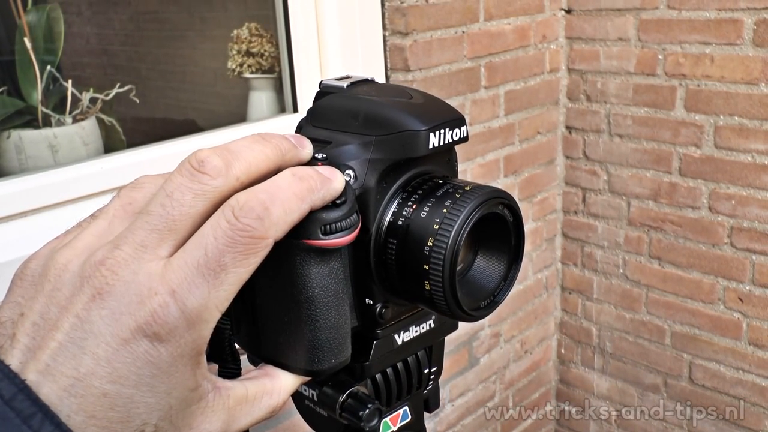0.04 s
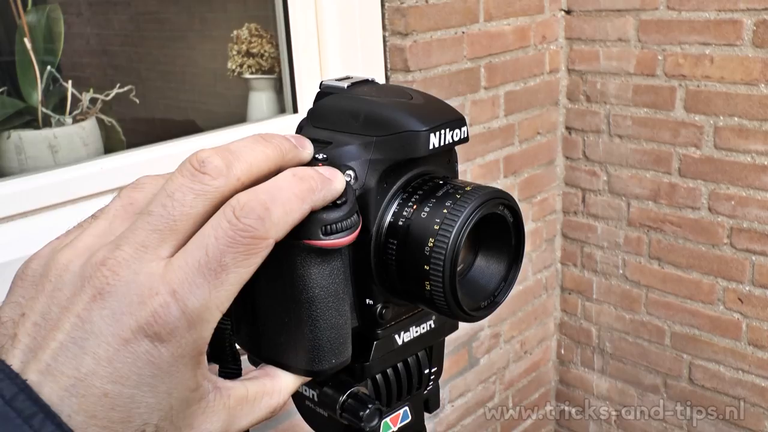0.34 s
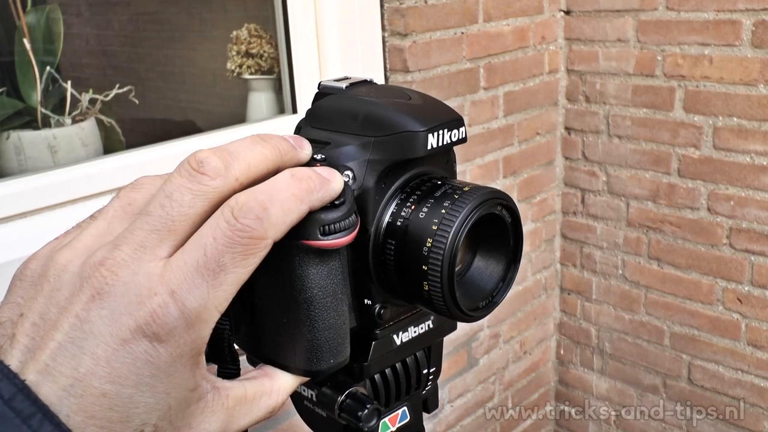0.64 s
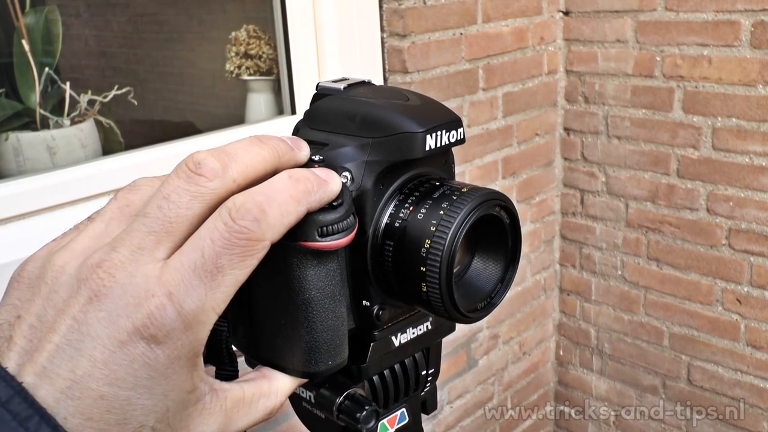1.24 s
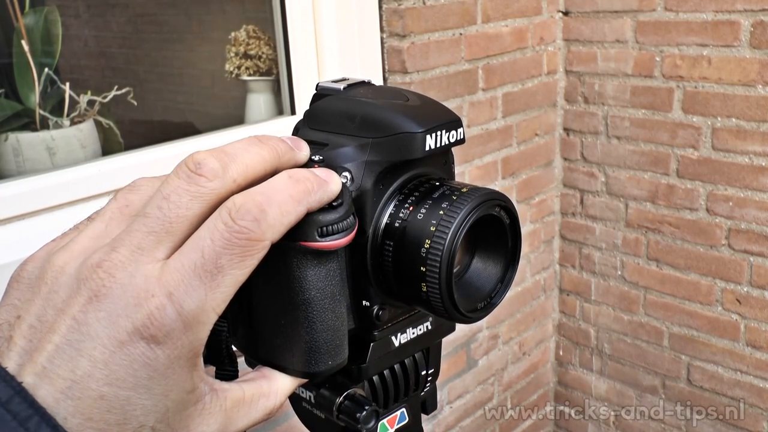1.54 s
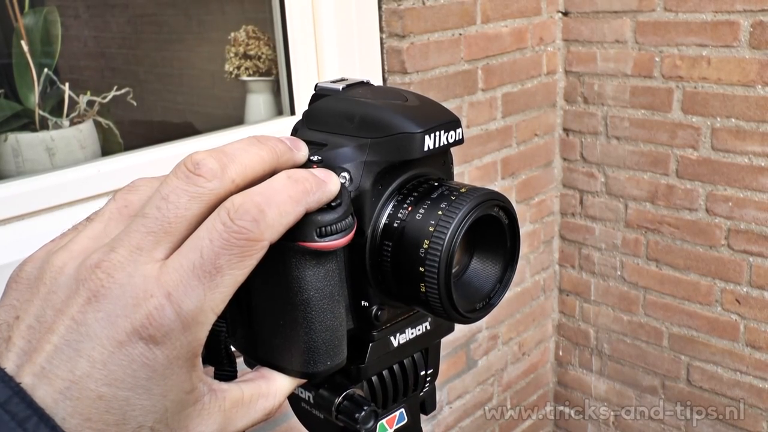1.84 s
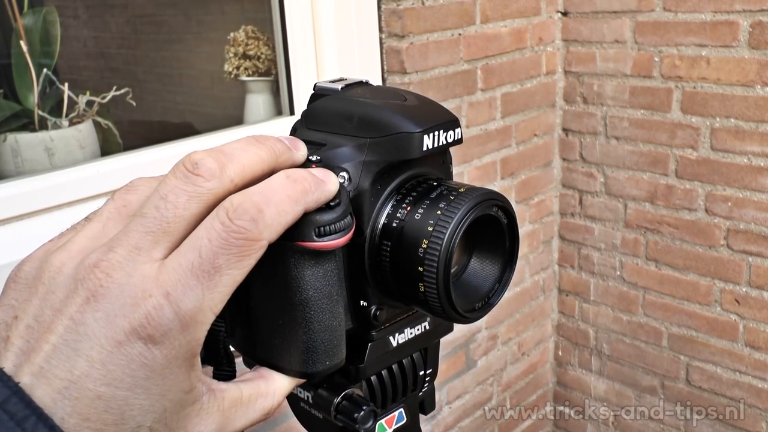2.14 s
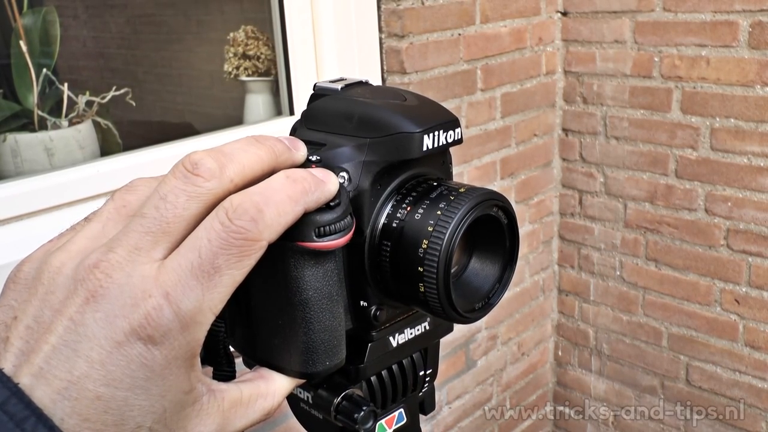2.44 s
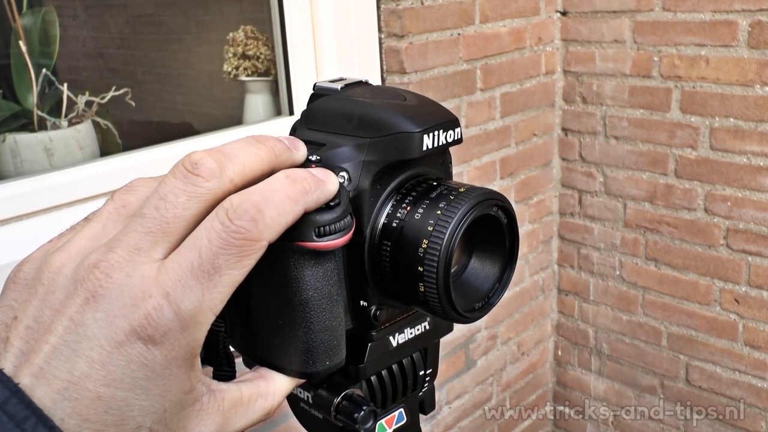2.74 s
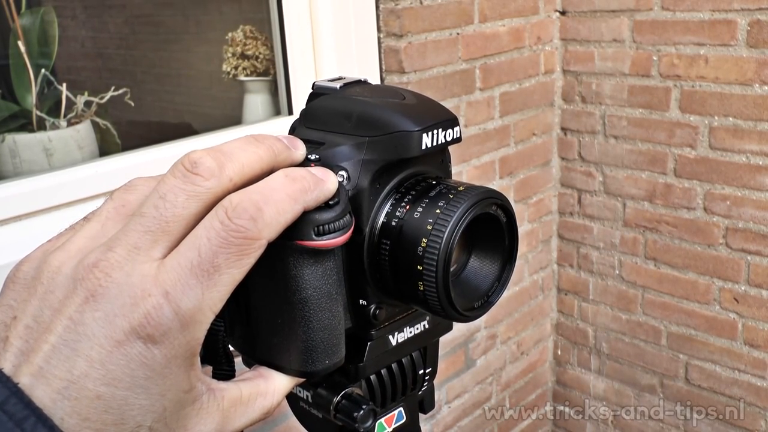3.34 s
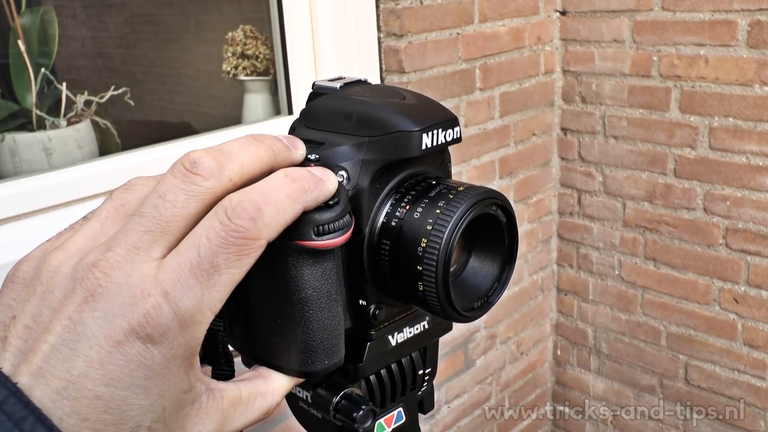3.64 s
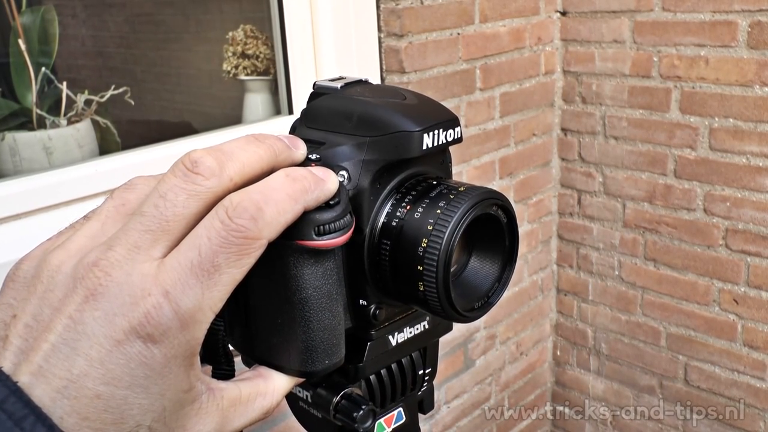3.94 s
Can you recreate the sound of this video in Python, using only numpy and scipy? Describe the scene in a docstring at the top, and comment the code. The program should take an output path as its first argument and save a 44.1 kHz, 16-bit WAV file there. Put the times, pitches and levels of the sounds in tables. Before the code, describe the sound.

Camera shutter clacks in a rapid, steady burst, close up, for about four seconds.

```python
"""Between nearby walls, a reflex camera on a tripod fires a steady burst, close to the microphone and a
little to its right. In every frame a motor starts, the mirror flips up, the aperture lever stops, two
shutter curtains strike, gears rewind and the mirror drops. Each blow rings the same camera body.
The walls answer, and a faint rumble and low hum lie underneath."""
import sys
import numpy as np
from scipy import signal
from scipy.fft import rfft, irfft
from scipy.io import wavfile
from scipy.ndimage import uniform_filter1d

SR = 44100
rng = np.random.default_rng(int(sys.argv[2]) if len(sys.argv) > 2 else 0)


def store_pcm(level_fs):
    """Save levels as 16-bit WAV."""
    pcm = np.round(np.clip(level_fs, -1, 1) * 32767).astype(np.int16)
    wavfile.write(sys.argv[1], SR, np.atleast_2d(pcm).T)


N = 176400
FFT_SIZE, RING_SAMPLES = 8192, 1500
FRAMES, FIRST_FRAME_S, FRAME_S = 23, -0.06982, 0.17493

# Blows of one frame, timed from the first curtain: motor engages; mirror hits the top; aperture lever
# catches, stops, rebounds; first curtain strikes, settles; second curtain brakes, lands; cocking cam;
# curtains latch; mirror drops.
# start_ms, scatter_ms, chatter_ms, fresh_share (0-1, new each frame), then level_db at each band
BLOWS = [ (-49.5, .2, 0.92, .5, -19, -11, -12.5, -12.5, -18.5, -28, -19),
         (-30, .3, 2.2, 0.23, -11, 0.5, -1, -2, -3.5, 1.5, 4.5),
         (-19.5, .2, 0.6, 0.31, -8.5, -17, -9, -24, -11, -16, -30.5),
         (-16.5, .2, 1.2, .3, 7, -20.5, -2, -3, -1.5, -5.5, -6),
         (-15, .2, 0.98, 0.31, 10, -15, -1.5, -5.5, -2.5, -7.5, -16),
         (-0.5, 0.024, 0.45, .08, -7, 0, -1.5, 2.5, 1.5, 1, 4),
         (1.0, 0.028, 2.5, .2, 2, -8, -12, -13, -10, -19, -18),
         (12, 0.021, 1.2, 0.21, -8, -7, -7, -13, 1, 0, -1),
         (13.5, .03, 0.78, 0.21, -2, -18, -12.5, -0.5, -1.5, -7, 1),
         (30.5, 0.32, 1.5, 1, -11.5, -15, -18, -18, -30, -8, -11),
         (44, .3, 0.42, 0.89, -10, -12, -13.5, -9, -14, -6, -4),
         (58.5, 0.44, 2.43, 0.45, -2, 0.5, 1, -1, 1, -5.5, -6.5), ]
# Bands of those levels: pitch_hz
BLOW_BANDS_HZ = [500, 1700, 2800, 4500, 6400, 10000, 13500]
# Resonances of the camera body: pitch_hz, width_hz, level_db
BODY_MODES = [(425, 57, -3), (620, 216, -1), (846, 70, 6.5), (1380, 320, 7), (1761, 290, 18),
              (2290, 260, 8.5), (2544, 376, 14.5), (3040, 330, 9), (4180, 1015, 13.5), (5550, 600, 15),
              (6275, 390, 16), (6680, 250, 15), (9860, 1630, 7), (12530, 1400, 1), (13800, 890, 0)]
# Tone of the gears lifting the mirror: pitch_hz, level_db
LIFT_TONE = [(500, 5), (1000, -2.5), (1700, -2), (2800, 1.5), (4300, 0.5), (5400, -4), (6700, 1.5),
             (8000, -3), (13500, -9)]
# Tone of the gears rewinding: pitch_hz, level_db
REWIND_TONE = [(500, 5.5), (1100, 3), (1700, -5.5), (3400, 4.5), (5400, -2.5), (6400, -2), (8000, -0.5),
               (10500, -1), (14000, -2)]
# Direct sound on the microphone's far, left side against its right: pitch_hz, level_db
LEFT_SHADE = [(100, 13), (400, -8), (1300, -4.5), (3000, -5), (4500, -6.5), (6400, -10.5), (8000, -2.5),
              (10000, -9.5), (14000, -14)]
# Tone of the wall echo: pitch_hz, level_db
WALL_TONE = [(300, -1), (1500, -2), (4000, -3.5), (7000, -5.5), (10000, -2), (14000, -0.5)]
# Background rumble: pitch_hz, density_db (power per Hz)
RUMBLE_SPECTRUM = [(18, -86), (29, -78), (44, -86), (100, -79), (170, -78), (245, -75), (330, -83),
                   (410, -81), (550, -87), (750, -84), (1200, -90), (3000, -93), (6000, -101), (8500, -112),
                   (15000, -113)]


def mechanism_blows(body, lead_ms=6, contact_ms=.34, slide_ms=1.1, slide_db=-18, scatter_db=.5):
    """Metal parts slide into contact, then chatter and ring the body, much alike from frame to frame."""
    track = np.zeros(N + SR)
    ms = np.arange(FFT_SIZE) / SR * 1000 - lead_ms
    after_ms = np.maximum(ms, 0)
    slide = undb(slide_db) * np.exp(-abs(ms) / slide_ms)
    for start_ms, scatter_ms, chatter_ms, fresh_share, *band_db in BLOWS:
        chatter = (1 - np.exp(-after_ms / contact_ms)) * np.exp(-after_ms / chatter_ms)
        force = rfft(frame_noise(fresh_share) * (chatter + slide))
        # Divide out the force's broad colour, so body and bands set the tone.
        colour = np.sqrt(uniform_filter1d(np.mean(abs(force) ** 2, axis=0), size=150))
        tone = gain_curve(list(zip(BLOW_BANDS_HZ, band_db)), FFT_SIZE)
        clicks = irfft(force * minimum_phase(body * tone / colour))[:, :RING_SAMPLES]
        for frame, (late, strong) in enumerate(rng.standard_normal((FRAMES, 2))):
            click = clicks[frame] * undb(scatter_db * strong)
            add_to_frame(track, click, frame, start_ms - lead_ms + scatter_ms * late)
    return track


def motor_run(body, tone, start_ms, stop_ms, drive_db, rise_db, teeth_hz, ramp_ms=1.55):
    """A short run of the gear train in each frame: every tooth scrapes and shakes the body."""
    track = np.zeros(N + SR)
    t = np.arange(FFT_SIZE) / SR
    ms, run_ms = t * 1000, stop_ms - start_ms
    gate = np.clip(np.minimum(ms, run_ms - ms) / ramp_ms, 0, 1)
    drive = gate * undb(drive_db + rise_db * ms / run_ms)
    response = minimum_phase(body * gain_curve(tone, FFT_SIZE))
    for frame, scrape in enumerate(frame_noise(fresh_share=.86)):
        teeth_passed = t * teeth_hz * (1 + .03 * rng.standard_normal())
        tooth_gain = undb(2 * rng.standard_normal(FFT_SIZE))
        mesh = np.exp(-(teeth_passed % 1) / .8) * tooth_gain[teeth_passed.astype(int)]
        force = scrape * drive * mesh / np.sqrt(np.mean(mesh ** 2))
        whirr = irfft(rfft(force) * response)[:np.count_nonzero(gate) + RING_SAMPLES]
        add_to_frame(track, whirr, frame, start_ms)
    return track


def camera_body(steepness=1.184):
    """Gain by frequency of the body, whose resonances add in power."""
    f = np.fft.rfftfreq(FFT_SIZE, 1 / SR) + 1
    power = 0
    for pitch_hz, width_hz, level_db in BODY_MODES:
        detuning = (f * f - pitch_hz ** 2) / (f * width_hz)
        power += undb(level_db) ** 2 / (1 + detuning ** 2 / steepness) ** steepness
    return np.sqrt(power)


def at_microphone(camera):
    """Close direct sound, shaded on the left, with short reflections off hand and tripod
    and a longer wall echo that starts at once."""
    size = 2 * FFT_SIZE
    left = minimum_phase(gain_curve(LEFT_SHADE, size))
    direct = irfft(np.array([left, np.ones_like(left)]))
    walls = reflections(delay_ms=-1.5, t60_s=.26, treble_t60_s=.15, left_db=-13.5, right_db=-8)
    walls = irfft(rfft(walls) * minimum_phase(gain_curve(WALL_TONE, size)))
    near = reflections(delay_ms=2, t60_s=.1, treble_t60_s=.14, left_db=-17.5, right_db=-14)
    response = (direct + near + walls)[:, :FFT_SIZE]
    return signal.fftconvolve(camera[None], response, axes=1)[:, SR:SR + N]


def reflections(delay_ms, t60_s, treble_t60_s, left_db, right_db, treble_hz=7000):
    """A dense echo on each side of the microphone; the treble fades at its own rate."""
    size = 2 * FFT_SIZE
    t = np.arange(size) / SR - delay_ms / 1000
    noise = stereo_spectrum(size, wide_hz=1000)
    low = noise / (1 + (np.fft.rfftfreq(size, 1 / SR) / treble_hz) ** 4)
    fade = lambda seconds: (t > 0) * undb(-60 * abs(t) / seconds)
    echo = irfft(low) * fade(t60_s) + irfft(noise - low) * fade(treble_t60_s)
    return echo / np.linalg.norm(echo, axis=1, keepdims=True) * undb([[left_db], [right_db]])


def rumble():
    """Faint steady noise around the microphone, wider towards the treble."""
    spectrum = stereo_spectrum(N, wide_hz=330) * gain_curve(RUMBLE_SPECTRUM, N)
    return irfft(spectrum * np.sqrt(SR / 2), N)


def hum(pitch_hz=70.5, level_db=-57.5, waver_db=1.6, drift_rad=.5):
    """A low, centred tone that wavers in phase and level."""
    phase = 2 * np.pi * pitch_hz * np.arange(N) / SR + drift_rad * wander(4.46)
    return np.sqrt(2) * np.sin(phase) * undb(level_db + waver_db * wander(6.35))


def frame_noise(fresh_share):
    """One row of noise per frame: a part always the same, a part new each time."""
    same = rng.standard_normal(FFT_SIZE)
    fresh = rng.standard_normal((FRAMES, FFT_SIZE))
    return np.sqrt(1 - fresh_share) * same + np.sqrt(fresh_share) * fresh


def add_to_frame(track, sound, frame, offset_ms):
    """Mix a sound into one frame of the burst; the track begins one second early."""
    start_s = FIRST_FRAME_S + frame * FRAME_S + offset_ms / 1000
    i = int(round((start_s + 1) * SR))
    track[i:i + len(sound)] += sound[:len(track) - i]


def stereo_spectrum(size, wide_hz):
    """Spectrum of noise that is alike on both sides in the bass and unrelated in the treble."""
    f = np.fft.rfftfreq(size, 1 / SR)
    mid, side = rfft(rng.standard_normal((2, size)))
    width = f / np.hypot(f, wide_hz)
    return (mid + side * width * np.array([[1], [-1]])) / np.sqrt(1 + width ** 2)


def wander(rate_hz):
    """Smooth random drift with a spread of 1."""
    hold = int(SR / rate_hz)
    steps = np.repeat(rng.standard_normal(N // hold + 1), hold)
    drift = uniform_filter1d(uniform_filter1d(steps, hold), hold)[:N]
    return drift / drift.std()


def gain_curve(points, size):
    """Gain of (pitch_hz, level_db) points at every frequency of a transform."""
    hz, db = np.array(points, float).T
    return undb(np.interp(np.log(np.fft.rfftfreq(size, 1 / SR) + 1), np.log(hz), db))


def minimum_phase(gain):
    """Spectrum of the promptest causal response with these gains."""
    cepstrum = irfft(np.log(gain))
    half = len(cepstrum) // 2
    folded = np.r_[cepstrum[0], 2 * cepstrum[1:half], cepstrum[half]]
    return np.exp(rfft(folded, len(cepstrum)))


def undb(db):
    """Decibels to gain."""
    return 10 ** (np.asarray(db) / 20)


def scene():
    """The firing camera up close, with rumble and hum behind it."""
    body = camera_body()
    camera = mechanism_blows(body)
    camera += motor_run(body, LIFT_TONE, start_ms=-49.5, stop_ms=13,
                        drive_db=-34.5, rise_db=-2.5, teeth_hz=903.5)
    camera += motor_run(body, REWIND_TONE, start_ms=15, stop_ms=59.5,
                        drive_db=-33.5, rise_db=1.5, teeth_hz=1299)
    return at_microphone(camera) + rumble() + hum()


def record(dry):
    """The recorder clips at full scale and cuts the treble above 15.3 kHz."""
    lowpass = signal.ellip(8, .2, 70, 15300, fs=SR, output="sos")
    return signal.sosfilt(lowpass, np.clip(dry, -1, 1))


dry = scene()
out = record(dry)
store_pcm(out)
```